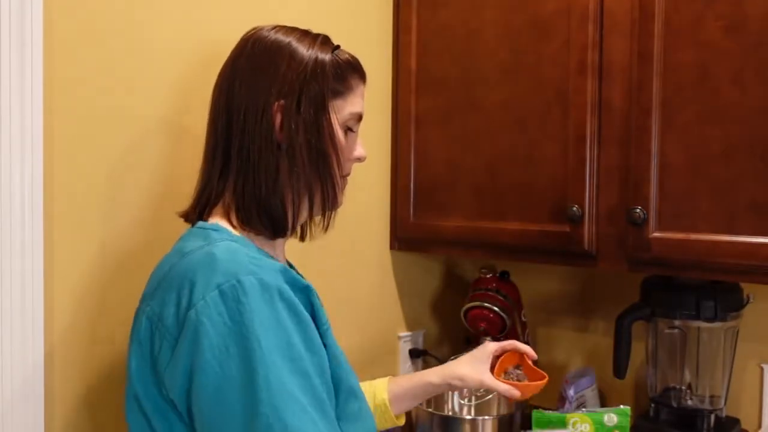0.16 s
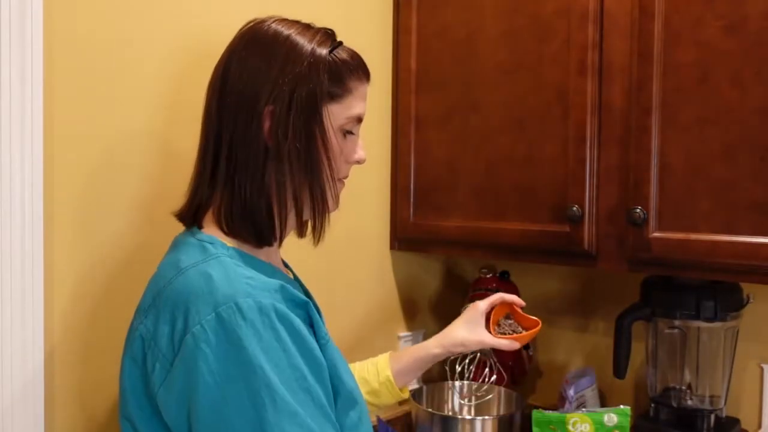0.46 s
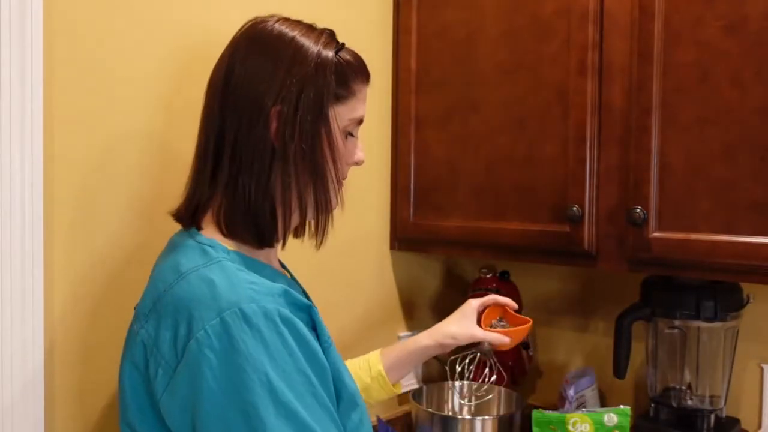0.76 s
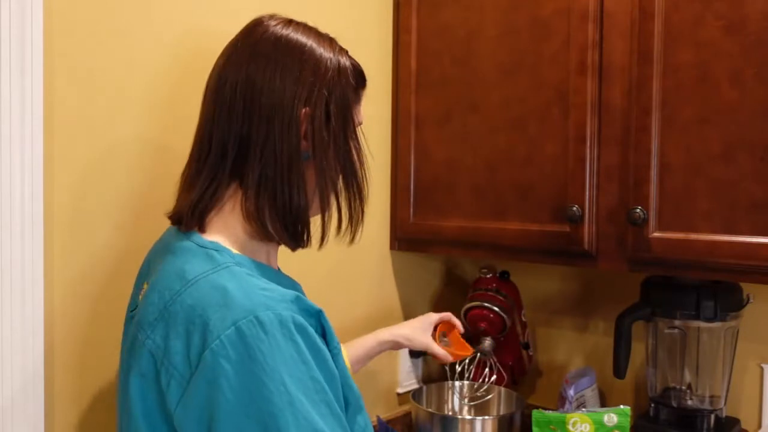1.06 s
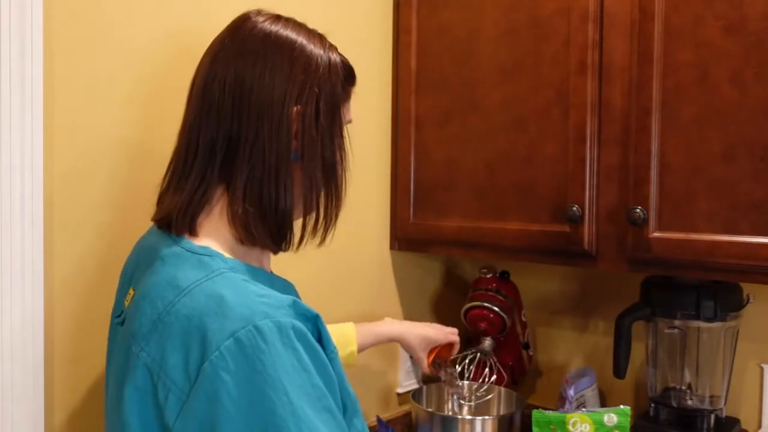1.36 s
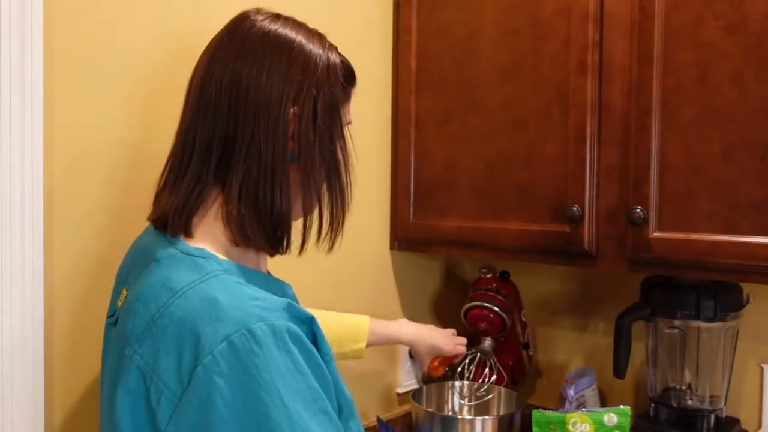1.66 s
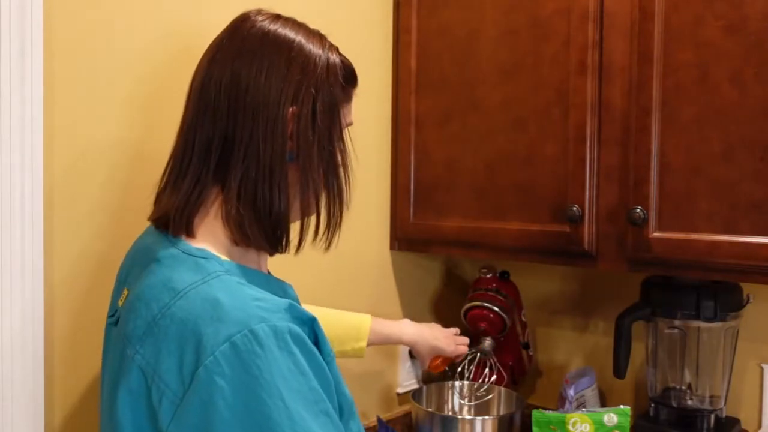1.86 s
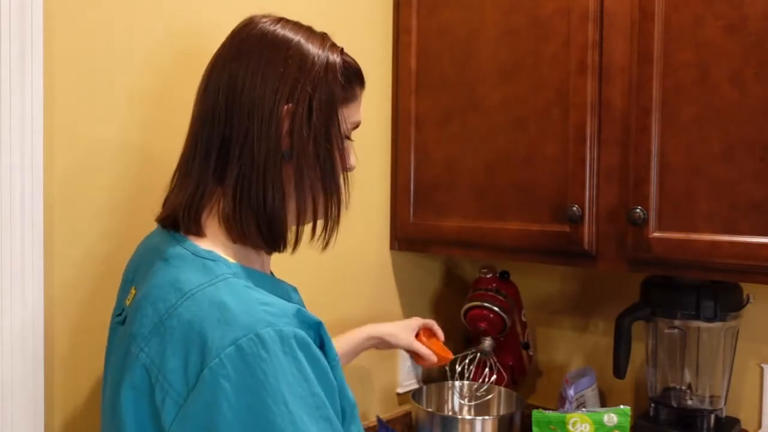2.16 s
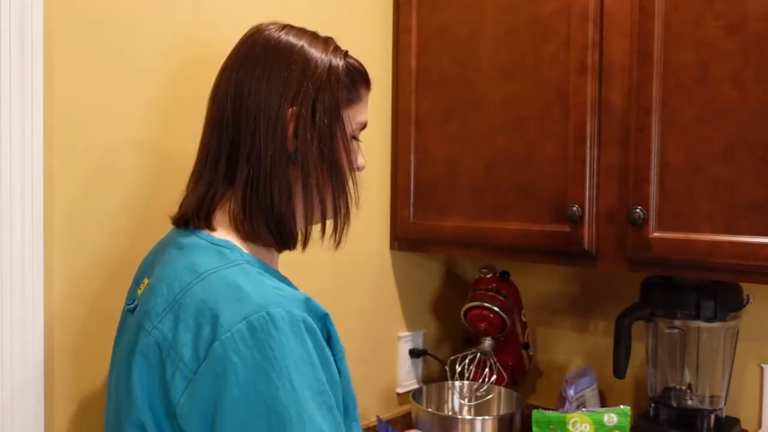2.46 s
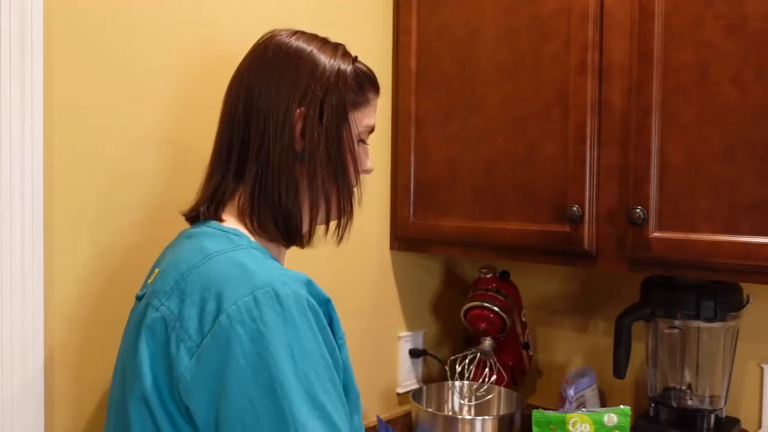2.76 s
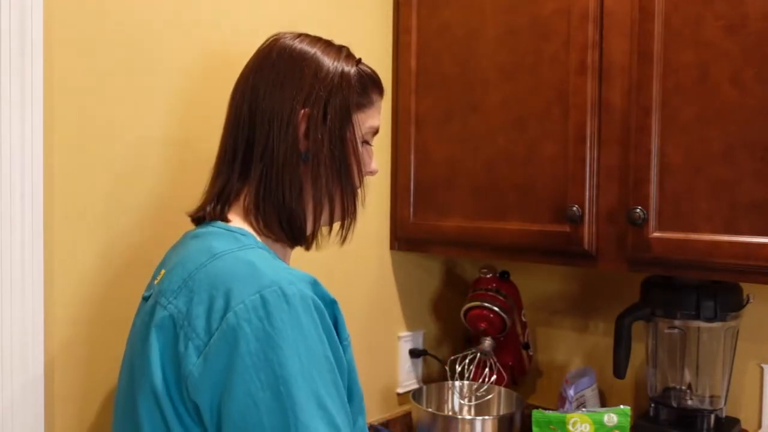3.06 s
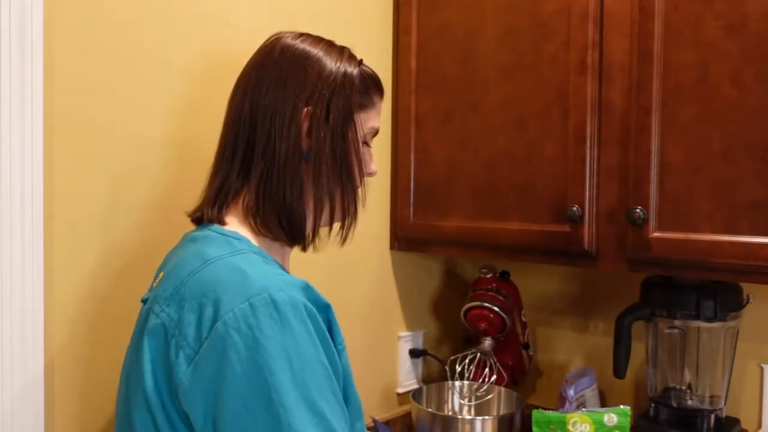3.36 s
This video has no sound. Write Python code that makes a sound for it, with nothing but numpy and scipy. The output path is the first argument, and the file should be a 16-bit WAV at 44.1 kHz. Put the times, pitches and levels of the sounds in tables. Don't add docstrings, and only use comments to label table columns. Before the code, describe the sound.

Dry nibs are shaken from a small cup into a steel mixing bowl, between foil pouch crackles.

```python
import sys
import numpy as np
from scipy import signal
from scipy.fft import rfft, irfft
from scipy.io import wavfile
from scipy.ndimage import uniform_filter1d

SR = 44100
rng = np.random.default_rng(int(sys.argv[2]) if len(sys.argv) > 2 else 0)


def transcribe(u):
    v = np.clip(np.atleast_2d(u).T, -1, 1)
    q = np.round(v * 32767).astype(np.int16)
    wavfile.write(sys.argv[1], SR, q)


def voltage_ratio(level):
    return 10 ** (np.asarray(level, float) / 20)


N = 154350


def unit(x):
    return x / np.sqrt(np.mean(x ** 2))


def noise():
    return rng.standard_normal(N)


def colour(x, points):
    p = np.array(points)
    hz = np.maximum(np.arange(2049) * SR / 4096, 1)
    log_gain = np.interp(np.log(hz), np.log(p[:, 0]), p[:, 1]) * np.log(10) / 20
    cepstrum = irfft(log_gain)
    cepstrum[1:2048] *= 2
    cepstrum[2049:] = 0
    response = irfft(np.exp(rfft(cepstrum)))
    return signal.fftconvolve(x, response)[:len(x)]


def high(x, hz):
    return signal.sosfilt(signal.butter(2, hz, "high", fs=SR, output="sos"), x)


def modes(x, table):
    out = 0
    for hz, db, t60 in table:
        radius = np.exp(-np.log(1000) / (max(t60, .002) * SR))
        angle = 2 * np.pi * hz / SR
        resonator = [0, radius * np.sin(angle)], [1, -2 * radius * np.cos(angle), radius * radius]
        out = out + voltage_ratio(db) * signal.lfilter(*resonator, x)
    return out


def grains(rate, spread_db):
    chance, sign, size = rng.random((3, N))
    level = spread_db * np.minimum(-np.log(1 - size), 4.0)
    return unit((chance < rate / SR) * np.sign(sign - .5) * voltage_ratio(level))


def curve(rows, edge=0.028):
    r, t = np.array(rows), np.arange(N) / SR
    inside = np.minimum(t - r[0, 0] + edge, r[-1, 0] + edge - t) / edge
    return voltage_ratio(np.interp(t, r[:, 0], r[:, 1])) * np.clip(inside, 0, 1)


def fade(start, decay, rise=0.00097):
    t = np.maximum(np.arange(N) / SR - start, 0)
    return (1 - np.exp(-t / rise)) * np.exp(-t / max(decay, .001))


def blow(start, push):
    t = (np.arange(N) / SR - start) / max(push, 2 / SR)
    return np.where((t > 0) & (t < 1), np.sin(np.pi * t) ** 2, 0) * 2 / (push * SR)


def spread(mid, side, wide):
    return np.array([mid + wide * side, mid - wide * side])


# time in seconds, level in dB.
SQUEEZE_CURVES = [
    [(0, -35), (.09, -37), (.13, -29.5), (.18, -23.5), (.23, -23.5), (.28, -28), (.335, -29.5), (.36, -45),
     (.43, -44)],
    [(.5, -21), (.57, -42.5), (.63, -31.5), (.8, -75)],
    [(2.2, -49), (2.31, -50), (2.35, -33.5), (2.41, -37), (2.44, -38), (2.55, -46), (2.6, -37),
     (2.88, -42.5)],
    [(3.0, -31.5), (3.12, -38), (3.21, -36), (3.3, -40.5), (3.36, -47), (3.5, -40.5)],
]
# frequency in Hz, density in dB per Hz.
FOIL_SPECTRUM = [(150, -76), (250, -28), (538, -9.5), (1080, -5), (1260, -3), (2240, -2), (9010, -15),
                 (14400, -28.5), (16000, -42)]


def foil_crackle():
    creases = grains(2500, 2.5) + 0.49 * noise()
    crackle = unit(colour(creases, FOIL_SPECTRUM))
    lumps = unit(uniform_filter1d(uniform_filter1d(noise(), size=200), size=200))
    crunch_db = 2
    return crackle * voltage_ratio(crunch_db * lumps) * sum(curve(rows) for rows in SQUEEZE_CURVES)


# start in seconds, peak in dB, colour in Hz, decay in seconds.
FOLD_SNAPS = [(0.024, -15, 1610, 0.012), (0.281, -5, 1540, 0.006), (0.436, -13.5, 1560, 0.0086),
              (0.441, -11.5, 1550, 0.014), (0.4896, -2.5, 1730, 0.0048), (.494, -3.5, 800, 0.0082),
              (0.602, -0.5, 2250, 0.0097), (2.29, -24, 2250, 0.033), (2.362, -14, 1660, 0.0049),
              (2.391, -14, 2600, 0.019), (2.568, -11, 1870, 0.01), (2.998, -2, 1680, 0.009),
              (3.17, -15, 1600, 0.0079), (3.197, -13.5, 1950, 0.0095), (3.312, -15, 1600, 0.013),
              (3.339, -11.5, 1030, 0.014), (3.462, -21.5, 2300, 0.0084)]
# start in seconds, peak in dB, colour in Hz.
CREASE_POPS = [(.102, -18, 1240), (0.127, -7, 1400), (0.136, -11, 1220), (.146, -4.5, 1330),
               (0.156, -12.5, 1250), (.165, -11, 1200), (0.17, -2.5, 1680), (0.18, -7.5, 2140),
               (0.191, -4.5, 2000), (0.204, -5.5, 1500), (0.221, -7, 2400), (.253, -12, 3000)]


def foil_snaps():
    foil = grains(6000, 2.84)
    broad, bright = unit(colour(foil, FOIL_SPECTRUM)), unit(high(foil, 7500))
    snaps = [(*row, -9) for row in FOLD_SNAPS]
    pops = [(s, db - 3, hz, 0.0055, 5) for s, db, hz in CREASE_POPS]
    out = np.zeros(N)
    for s, db, hz, decay, peak_db in snaps + pops:
        i = slice(int(s * SR) - 400, int(s * SR) + 8000)
        peak = signal.lfilter(*signal.iirpeak(hz, 3.0, fs=SR), foil[i])
        burst = broad[i] + voltage_ratio(peak_db) * unit(peak) + voltage_ratio(-19) * bright[i]
        out[i] += voltage_ratio(db - 12) * fade(s, decay, 0.0019)[i] * burst
        click = modes(blow(s, .0001)[i], [(hz, 0, .006), (1.58 * hz, -4, .004)])
        out[i] += voltage_ratio(db - 5) * high(click, 660)
    return out


def foil_tick():
    burst = fade(.584, .001, .0004) * noise()
    ring = modes(burst, [(1500, 9, 0.008), (3020, 5.5, 0.0086), (4900, 2.5, .006), (7050, -6, .005)])
    return voltage_ratio(-27.5) * high(ring, 720)


# start in seconds, peak in dB, decay in seconds.
NIB_SHAKES = [(0.886, -30.5, 0.02), (1.3055, -7.5, 0.0076), (1.3214, -10, 0.011), (1.338, -13, 0.0088),
              (1.352, -30, 0.015), (1.5132, -1, 0.015), (1.5655, -9.5, 0.022), (1.5889, 0.5, 0.01),
              (1.6024, -6.5, 0.024), (1.6494, -12.5, 0.028), (1.6778, -2, 0.014), (1.696, -15.5, 0.023),
              (1.73, -9.5, 0.016), (1.759, -5, 0.012), (1.8548, -6, 0.0094)]
# time in seconds, level in dB.
NIB_TRICKLE = [
    (1.25, -52.5),
    (1.31, -48),
    (1.4, -38),
    (1.5, -34),
    (1.55, -27.5),
    (1.75, -31),
    (1.8, -50),
]
# frequency in Hz, density in dB per Hz.
PATTER_SPECTRUM = [(1470, -61), (2500, -26.5), (3130, -27.5), (4400, -18.5), (5200, -3), (6100, 3.5),
                   (7530, 2), (10900, -12), (14100, -24), (16000, -28)]
# frequency in Hz, level in dB.
WHISK_WIRES = [(5060, 9.5), (5620, 8), (5737, -4), (5886, 10), (6105, 1), (6580, -5), (6830, 6),
               (7257, -12), (7610, -7), (7760, 3), (8800, -21), (9700, 1)]


def nibs():
    hail = grains(4500, 2.0)
    trickle = curve(NIB_TRICKLE)
    flow = trickle + sum(voltage_ratio(db - 10.5) * fade(s, decay, 0.0026) for s, db, decay in NIB_SHAKES)
    patter = unit(colour(hail, PATTER_SPECTRUM)) * flow
    wires = [(hz, db, 0.04) for hz, db in WHISK_WIRES]
    steady_rms = np.sqrt(np.mean(modes(hail, wires) ** 2))
    ringing = voltage_ratio(-5) * high(modes(hail * flow, wires), 5500) / steady_rms
    dust = trickle * unit(high(high(grains(3000, 2.5), 6400), 6400))
    return dust + patter + ringing


# start in seconds, peak in dB, favoured frequency in Hz.
RIM_TAPS = [
    (1.2737, -14.5, 2600),
    (1.2773, -22, 3100),
    (1.3041, -17, 3200),
    (1.3098, -13.5, 4400),
    (1.324, -18, 4300),
    (1.333, -14.5, 3100),
    (1.345, -26, 1700),
]
# frequency in Hz, level in dB, t60 in seconds.
RIM_MODES = [(1600, -3.5, 0.05), (1695, -3.5, 0.04), (2076, -13.5, 0.086), (3085, -10, 0.05),
             (3200, -1.5, 0.031), (4240, 0, 0.027), (4330, -4.5, 0.037), (6300, -8, 0.039),
             (6360, -15, 0.033), (7260, -4, 0.03), (9000, -10, 0.013), (10000, -8, 0.013),
             (10530, -3, 0.022), (11600, 6, 0.012)]


def rim_taps():
    out = 0
    for s, db, favoured in RIM_TAPS:
        table = [(hz, g - 4 * abs(np.log2(hz / favoured)), t60) for hz, g, t60 in RIM_MODES]
        scrape = fade(s, 0.0019, 0.00024) * noise()
        out = out + voltage_ratio(db - 22.0) * modes(scrape, table) + voltage_ratio(db - 2) * high(scrape, 2200)
    return out


# start in seconds, peak in dB, frequency in
# Hz, t60 in seconds.
RIM_PINGS = [(1.35, -31, 4651, 0.38), (1.385, -35, 4680, 0.26), (1.417, -32.5, 3640, 0.082),
             (1.424, -33.5, 2300, .08), (1.452, -31, 3620, .07), (1.52, -29, 3640, 0.048),
             (1.676, -35, 4230, 0.024), (1.696, -24, 1518, 0.064), (1.698, -34, 2060, 0.044)]


def rim_pings():
    out = 0
    for s, db, hz, t60 in RIM_PINGS:
        pluck = fade(s, 0.0056, 0.0034) * noise()
        out = out + voltage_ratio(db - 16) * modes(pluck, [(hz, 0, t60), (1.008 * hz, -6, t60)])
    return out


# time in seconds, level in dB.
STRAY_NIBS = [
    (1.28, -40),
    (1.33, -37),
    (1.45, -37.5),
    (1.58, -60),
]


def rim_tinkle():
    table = [(hz, g - 2.7 * np.log2(hz / 3000), .6 * t60) for hz, g, t60 in RIM_MODES]
    return unit(modes(grains(600, 0.97), table)) * curve(STRAY_NIBS)


# frequency in Hz, level in dB, bandwidth in Hz.
HUM_BANDS = [(418, -46.5, 54), (755, -55, 33), (1266, -51, 60), (1830, -44, 21), (2400, -43.5, 510)]


def bowl_hum():
    t = np.arange(N) / SR
    start, stop, edge = 1.348, 1.622, 0.11
    rub = np.clip(np.minimum(t - start, stop - t) / edge, 0, 1)
    return rub * sum(voltage_ratio(db) * unit(modes(noise(), [(hz, 0, 2.5 / width)])) for hz, db, width in HUM_BANDS)


def bowl():
    return high(rim_taps() + rim_pings() + rim_tinkle(), 1400) + bowl_hum()


# start in seconds, peak in dB.
CUP_KNOCKS = [
    (2.7141, -1),
    (2.8958, -2),
    (2.955, -14.5),
]
# frequency in Hz, level in dB, t60 in seconds.
CUP_MODES = [(527, -45, .06), (1011, -40, .06), (1400, -16, 0.068), (1599, 8, 0.033), (1680, 2, 0.053),
             (1950, -17, 0.045), (2270, -32, 0.055), (3500, -26, 0.023)]
# frequency in Hz, level in dB, t60 in seconds.
CUP_UPPER_MODES = [(4290, -11, 0.045), (4580, -17, 0.096), (6430, -17, 0.054), (6570, -22, 0.068)]
# start in seconds, level in dB, frequency in Hz, t60 in seconds.
LANDING_CRACKS = [
    (2.7145, -25, 4550, 0.0091),
    (2.715, -23, 2700, .012),
    (2.8944, -14, 3560, 0.022),
]


def cup_knocks():
    out = sum(voltage_ratio(db - 18.5) * modes(blow(s, .0001), CUP_MODES + CUP_UPPER_MODES) for s, db in CUP_KNOCKS)
    for s, db, hz, t60 in LANDING_CRACKS:
        out += voltage_ratio(db) * modes(blow(s, .0001), [(hz, 0, t60), (1.25 * hz, -6, .01)])
    return out


# start in seconds, peak in dB, pitch in Hz.
FOOT_RATTLES = [(2.721, -15, 1530), (2.734, -17, 1444), (2.75, -14, 1484), (2.767, -20.5, 1550),
                (2.791, -21, 1550), (2.807, -22.5, 1515), (2.846, -30.5, 1550), (2.881, -23.5, 1380),
                (2.902, -7.5, 1583), (2.911, -8, 1638), (2.925, -17.5, 1393), (2.936, -9, 1680),
                (2.951, -8.5, 1443), (2.958, -10.5, 1617), (2.969, -4, 1599), (2.981, -16, 1636),
                (2.997, -17, 1500)]


def cup_rattles():
    rocks = [(3.019 + k * .0247, -10 - 5 * k, 1550) for k in range(8)]
    contacts = FOOT_RATTLES + rocks
    t = np.arange(9000) / SR
    swell = t * np.exp(-t / 0.002)
    out = np.zeros(N)
    for s, db, hz in contacts:
        scuff = rng.standard_normal(len(t))
        push = swell * (1.5 * scuff + np.sin(2 * np.pi * hz * t))
        ring = modes(push, [(hz, 0, 0.065)] + [(f, g - 4.5, t60) for f, g, t60 in CUP_MODES])
        out[int(s * SR):int(s * SR) + len(t)] += voltage_ratio(db + 1.0) * ring / np.abs(ring).max()
    return out


# time in seconds, level in dB.
CUP_SLIDE = [
    (2.72, -26.5),
    (2.76, -27),
    (2.8, -34.5),
    (2.85, -28.5),
    (2.885, -33),
]
# frequency in Hz, level in dB, t60 in seconds.
SLIDE_MODES = [(800, -2.5, 0.025), (1014, -0.5, 0.036), (1380, -8, 0.043), (1432, 0.5, .08),
               (1550, 0, 0.091), (1940, -1, 0.055), (2190, -11, 0.049), (2700, -19, .02)]
# start in seconds, peak in dB.
CUP_SHINES = [(2.717, -31.5), (2.746, -32), (2.78, -33), (2.9, -22.5), (2.933, -30), (2.955, -24.5),
              (2.966, -34)]


def cup_slide():
    slide = curve(CUP_SLIDE, 0.0088) * unit(modes(grains(1500, 2.1), SLIDE_MODES))
    shine = noise() * sum(voltage_ratio(db - 11) * fade(s, 0.0043) for s, db in CUP_SHINES)
    return slide + modes(shine, CUP_UPPER_MODES)


def counter_thud():
    thud = unit(colour(noise(), [(150, -59), (500, -8), (1500, 5.5), (2200, 4.0), (3500, -19), (8000, -27.0),
                                 (16000, -37.5)]))
    contacts = CUP_KNOCKS + FOOT_RATTLES
    return thud * sum(voltage_ratio(db - 13) * fade(s, 0.014, 0.00058) for s, db, *_ in contacts)


def echo(x):
    t = np.arange(SR) / SR
    reflections = rng.standard_normal(SR) * np.clip((t - .003) / 0.0024, 0, 1)
    top = high(reflections, 3500)
    tail = (reflections - top) * voltage_ratio(-60 * t / 0.47) + top * voltage_ratio(-60 * t / 0.43)
    return signal.fftconvolve(x, tail / np.sqrt(np.sum(tail ** 2)))[:N]


# frequency in Hz, density in dB per Hz.
AIR_SPECTRUM = [(18, -44), (60, -47), (189, -11), (295, 1.5), (328, -4.5), (1040, -2), (1430, -4.5),
                (1590, -4), (16000, -25.5)]
# frequency in Hz, level in dB.
FRIDGE_TONES = [
    (301.5, -71.5),
    (829.0, -65),
    (1007, -60.5),
]


def kitchen():
    t = np.arange(N) / SR
    mid, side = (unit(colour(noise(), AIR_SPECTRUM)) * voltage_ratio(-48) for _ in range(2))
    mid = mid + sum(voltage_ratio(db) * np.sqrt(2) * np.sin(2 * np.pi * hz * t) for hz, db in FRIDGE_TONES)
    return spread(mid, side, .24)


def scene():
    sources = foil_crackle() + foil_snaps() + foil_tick() + nibs() + bowl()
    sources = sources + cup_knocks() + cup_rattles() + cup_slide() + counter_thud()
    low_cut = 297
    dry = high(high(sources, low_cut), low_cut)
    return dry + spread(voltage_ratio(-6) * echo(dry), echo(dry), 0.13) + kitchen()


def glints(x):
    out, hold = 0, int(SR / 24)
    treble = uniform_filter1d(np.abs(high(x, 7000)), size=hold)[hold // 2::hold]
    quiet, loud = .07, .4
    share = quiet + (loud - quiet) * np.minimum(treble / .01, 1)
    for hz in range(7400, 15500, 800):
        u = rng.uniform(-1, 1, len(share))
        patches = np.repeat(np.sign(u) * (abs(u) < share), hold)
        on = np.resize(uniform_filter1d(patches, size=400), N)
        band = signal.sosfiltfilt(signal.butter(3, [hz, hz + 800], "band", fs=SR, output="sos"), x)
        out = out + np.array([-.6 * abs(on), voltage_ratio(-2) * on]) * band
    return out


def low_pass(x):
    return signal.sosfilt(signal.butter(12, 16510, fs=SR, output="sos"), x)


def record(dry):
    mid = dry.mean(axis=0)
    pan_db = -1.7
    side = (dry[0] - dry[1]) / 2 + mid * np.tanh(pan_db * np.log(10) / 40)
    side = signal.sosfiltfilt(signal.butter(10, 6900, fs=SR, output="sos"), side)
    duck, swing = glints(mid)
    x = spread(mid + duck, side + swing, 1)
    x = x / (1 + (x / .85) ** 6) ** (1 / 6)
    x = signal.sosfilt(signal.ellip(8, .2, 60, 15900, fs=SR, output="sos"), x)
    return low_pass(x)


dry = scene()
out = record(dry)
transcribe(out)
```